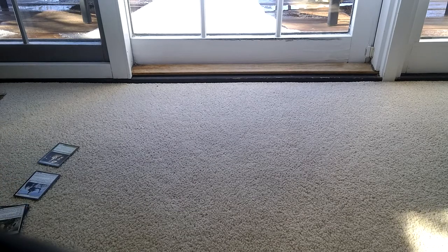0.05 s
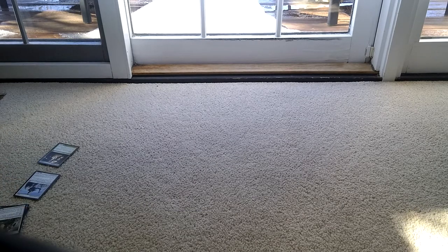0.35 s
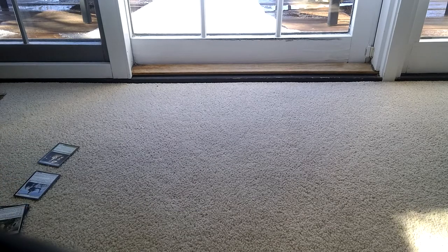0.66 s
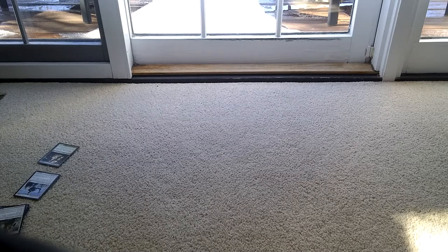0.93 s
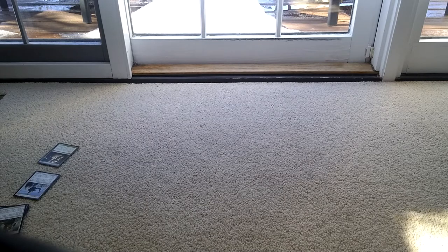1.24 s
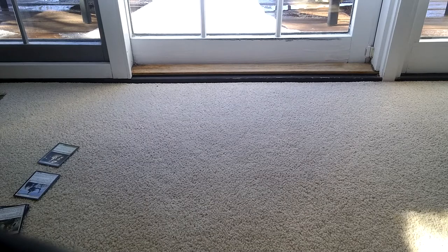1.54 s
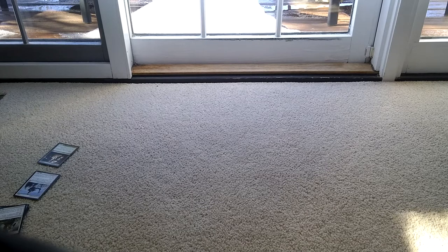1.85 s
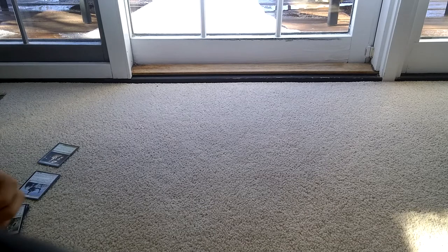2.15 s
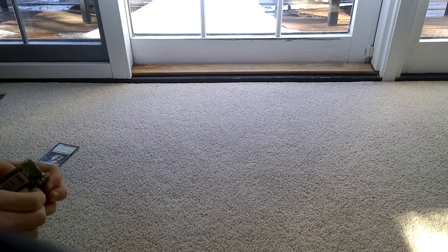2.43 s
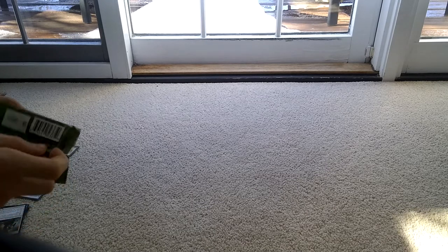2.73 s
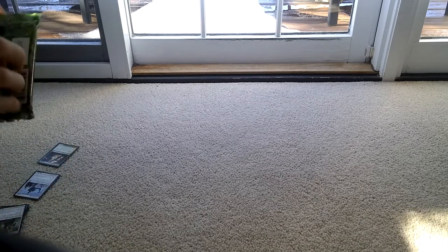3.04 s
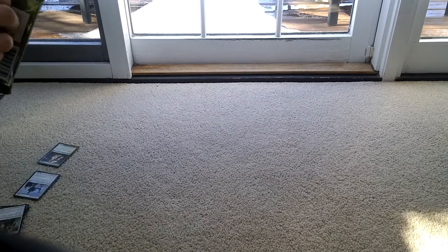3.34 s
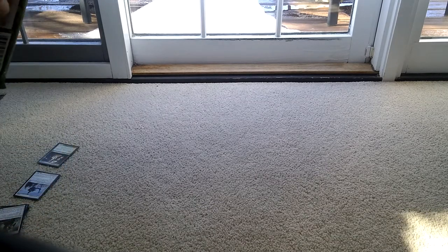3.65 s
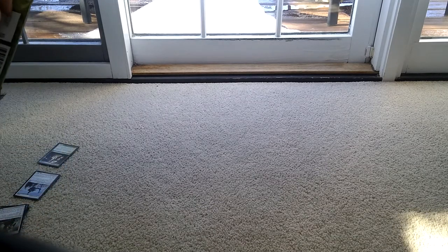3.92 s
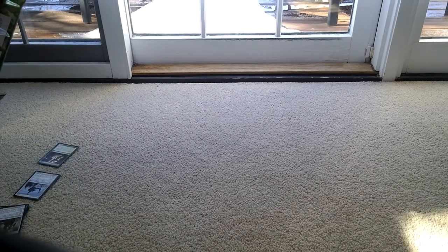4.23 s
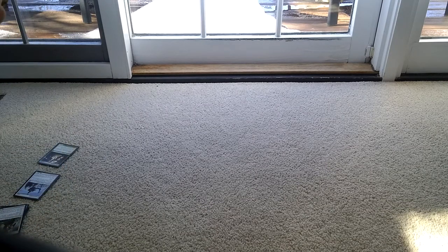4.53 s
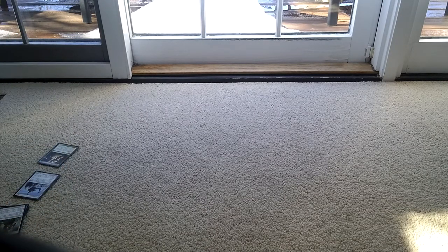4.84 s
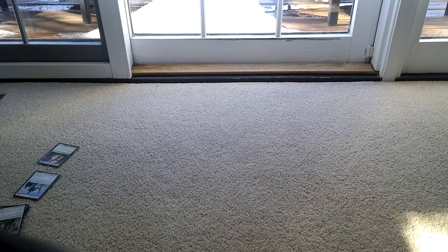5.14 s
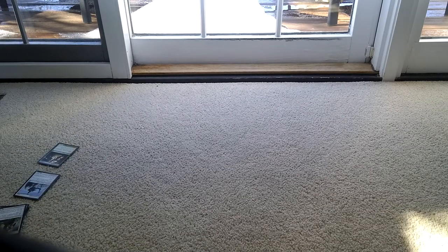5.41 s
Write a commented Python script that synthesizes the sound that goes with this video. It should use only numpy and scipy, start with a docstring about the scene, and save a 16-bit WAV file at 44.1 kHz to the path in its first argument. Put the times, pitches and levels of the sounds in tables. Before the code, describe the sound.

In a quiet carpeted room, a foil card wrapper crackles in uneven bursts, near the microphone and to the left, mixed with soft finger rubbing and taps. The handling pauses briefly, then a thin squeak leads into a short, loud rip. The foil keeps snapping and tears again at the end, with cards shifting inside, over a faint low hush.

```python
"""In a carpeted room, hands turn a foil card pack and tear it open, close by on the left.
Creases in the foil buckle with sharp snaps over finer crinkling, and whole panels flip with a pop.
The pinched seam squeaks, then rips. Fingers rub and knock the cards, which slide inside the pack.
A glass door and the room give a soft echo, and a low hush lies under it all."""
import sys
import numpy as np
from scipy import signal
from scipy.fft import rfft, irfft
from scipy.io import wavfile
from scipy.ndimage import uniform_filter1d, map_coordinates

SR = 44100
rng = np.random.default_rng(int(sys.argv[2]) if len(sys.argv) > 2 else 0)


def unload_wav(signal):
    """Save mono or channel-first audio to the path in sys.argv[1] as 16-bit WAV at rate SR, clipped to [-1, 1]."""
    wavfile.write(
        sys.argv[1],
        SR,
        np.round(np.clip(np.atleast_2d(signal).T, -1, 1) * 32767).astype(np.int16),
    )


N = 245794
TIME = np.arange(N) / SR
SIDES = np.array([[1], [-1]])  # left, right


def undb(db):
    """Turn decibels into a number to multiply by."""
    return 10 ** (np.asarray(db) / 20)


def unit(x):
    """Scale a sound to an average power of 1."""
    return x / np.sqrt(np.mean(x ** 2))


def butter(x, order, hz, kind):
    """Keep the lows, the highs or a band of a sound."""
    return signal.sosfilt(signal.butter(order, hz, kind, fs=SR, output="sos"), x)


def colour(x, points):
    """Shape the tone along a curve of (f/Hz, level/dB) points."""
    hz, db = np.transpose(points)
    f = np.fft.rfftfreq(x.shape[-1], 1 / SR) + 1
    return irfft(rfft(x) * undb(np.interp(np.log(f), np.log(hz), db)), x.shape[-1])


def place(x, pan_db):
    """Make the left side pan_db louder than the right."""
    return x * unit(undb(SIDES * pan_db / 2))


def add(out, x, t):
    """Mix a stereo sound in, with its middle at t seconds."""
    start = int(t * SR) - x.shape[1] // 2
    a, b = max(start, 0), min(start + x.shape[1], N)
    out[:, a:b] += x[:, a - start:b - start]


def gesture(start_s, length_s, db, swell_db=0, attack_s=0.013, release_s=0.037):
    """Loudness of one hand movement: it takes hold, changes by swell_db to reach db, and lets go."""
    t = TIME - start_s
    swell = undb(db + swell_db * (np.clip(t / length_s, 0, 1) - 1))
    return np.clip(t / attack_s, 0, 1) * swell * np.exp(-np.maximum(t - length_s, 0) / release_s)


def ringing(decay_s, size):
    """Stereo noise that dies away, with an energy of about 1 on each side."""
    tail = rng.standard_normal((2, size)) * np.exp(-np.arange(size) / SR / decay_s)
    return unit(tail) / np.sqrt(size)


def pulse(hz, octaves, travel_s, ring_db, ring_s, size):
    """A ripple in a sheet: its high notes arrive first, then it rattles between the edges."""
    f = np.fft.rfftfreq(size, 1 / SR) + 1
    band = np.exp(-(np.log2(f / hz) / (2 * octaves)) ** 2) / np.sqrt(f)
    phase_lag = 2 * np.pi * travel_s * (2 * np.sqrt(f * hz) - f)  # speed grows as the root of frequency
    rattle = rfft(ringing(ring_s, size // 2), size)
    apart = np.clip(f / 9000, 0, 1)  # low notes reach both sides alike
    rattle[1] = np.sqrt(1 - apart ** 2) * rattle[0] + apart * rattle[1]
    spectrum = band * np.exp(-1j * phase_lag) * (1 + undb(ring_db) * rattle)
    wave = np.roll(irfft(spectrum), size // 2, axis=1)
    return wave / np.sqrt(np.sum(wave ** 2, axis=1, keepdims=True))


def crackle(per_s, spread_db, tone, travel_s, ring_db=0):
    """Tiny buckles of uneven size at six pitches, each pitch clicking about per_s times a second."""
    out = 0
    for hz in np.geomspace(2500, 12000, 6):
        sizes = undb(spread_db * np.minimum(rng.exponential(size=N), 4)) * rng.choice([-1, 1], N)
        clicks = sizes * (rng.random(N) < per_s / SR)
        grain = pulse(hz, 0.72, travel_s, ring_db, ring_s=0.0022, size=1024) * np.sqrt(hz)
        out = out + signal.fftconvolve(clicks[None], grain, "same", axes=1)
    return unit(colour(out, tone))


# tone of the quiet room: f/Hz, level/dB
HUSH_TONE = [(20, -18.5), (60, 10.5), (120, -9), (200, -2), (330, -9), (1200, -13.5), (16000, -32.5)]
def air():
    """The low hush of the house, shared by both sides, and a separate hiss on each."""
    hush = butter(rng.standard_normal(N), 1, 500, "low")
    hiss = rng.standard_normal((2, N))
    bright_hiss = butter(hiss, 1, 500, "high")
    return unit(colour(hush + bright_hiss + .5 * hiss, HUSH_TONE)) * undb(-73.3)


# tone of the echo from the walls: f/Hz, level/dB
WALL_TONE = [(100, -3), (550, 0), (1000, 0), (1800, 1.5), (4000, 3.5), (8000, -2.5), (11000, -0.5),
             (16000, -0.5)]
def room(x, low_fade_s=0.26, high_fade_s=0.27, door_s=0.011):
    """The left side's sound bounces off the glass door, then dies away quickly around the room."""
    t = TIME[:SR // 2]
    low = butter(ringing(low_fade_s / np.log(1000), len(t)), 2, 5000, "low")  # 60 dB down per fade time
    high = butter(ringing(high_fade_s / np.log(1000), len(t)), 2, 5000, "high")
    tail = (low + high) * np.clip(t / door_s, 0, 1)
    door = np.roll(ringing(0.0037, len(t)), int(door_s * SR), axis=1)
    echo = undb(-11.2) * tail + undb(-17) * door
    return colour(signal.fftconvolve(x[:1], echo, axes=1)[:, :N], WALL_TONE) * undb(-3)


# skin strokes the pack: start t/s, length/s, level/dB
SKIN_STROKES = [(0, 0.51, -67.5), (0.272, .03, -51.5), (0.411, 0.25, -54.5), (0.919, 0.16, -67),
                (1.072, 0.11, -63.5), (1.221, 0.56, -58.5), (2.025, 0.12, -66), (2.245, 0.044, -57.5),
                (2.375, 0.12, -59.5), (2.573, 0.083, -58.5), (2.728, 0.08, -63), (2.987, 0.068, -51),
                (3.129, 0.48, -75), (4.042, 0.54, -68), (4.546, 0.14, -58.5), (4.904, 0.011, -51.5),
                (5.007, 0.099, -58.5), (5.183, 0.081, -55.5), (5.38, 0.27, -58)]
def rubbing():
    """How hard skin drags on the pack at each moment."""
    return sum(gesture(*stroke) for stroke in SKIN_STROKES)


def arms():
    """Moving arms make a faint rumble that swells with the rubbing."""
    middle, side = butter(rng.standard_normal((2, N)), 1, [45, 110], "band")
    rumble = unit(middle + .4 * SIDES * side)
    effort = uniform_filter1d(np.sqrt(rubbing()), SR // 4)
    return rumble * effort * undb(-43)


# tone of skin rubbing on the pack: f/Hz, level/dB
SKIN_TONE = [(70, -11.5), (190, -12), (330, -5), (580, -5), (850, -1), (1300, -6.5), (1750, -8.5),
             (2600, -16.5), (4000, -19), (9000, -51)]
# fingers knock the cards: t/s, level/dB, f/Hz, ring time/s
CARD_KNOCKS = [(0.299, -17, 550, 0.0013), (0.439, -17.5, 696, 0.016), (0.454, -23.5, 316, 0.022),
               (0.563, -16, 610, 0.0048), (0.582, -14.5, 696, 0.0017), (0.631, -22, 415, 0.0037),
               (0.933, -23.5, 636, 0.028), (1.109, -23, 644, .034), (1.359, -28, 520, 0.0035),
               (2.262, -26.5, 830, .012), (2.400, -17.5, 975, 0.0031), (2.562, -13.5, 1510, 0.0056),
               (2.648, -27.5, 384, 0.0093), (2.757, -28.5, 850, .012), (3.053, -25, 390, 0.0018),
               (3.191, -27, 161, 0.044), (3.235, -38.5, 740, .017), (4.369, -30, 810, 0.011),
               (4.552, -15.5, 430, .0038), (4.923, -26.5, 670, 0.00069), (5.222, -24, 545, 0.033),
               (5.413, -23.5, 590, 0.0033)]
def fingers(slips_per_s=700, thump_hz=222):
    """Skin drags over the pack in small slips; each knock on the cards also thumps the hand."""
    slips = rng.standard_normal(N) * (rng.random(N) < slips_per_s / SR)
    body = signal.fftconvolve(slips[None], ringing(0.004, size=1024), axes=1)[:, :N]
    out = unit(colour(slips + undb(10.5) * body, SKIN_TONE)) * rubbing()
    for t, db, hz, ring_s in CARD_KNOCKS:
        cards = pulse(hz, octaves=0.21, travel_s=0.00043, ring_db=-5, ring_s=ring_s, size=8192)
        flesh = pulse(thump_hz, octaves=1, travel_s=0.0011, ring_db=9, ring_s=ring_s, size=8192)
        knock = cards + undb(-4) * thump_hz / hz * flesh  # deeper knocks thump more
        add(out, undb(db) * knock[[0, 0]], t)  # same wave on both sides
    return place(out, pan_db=-1)


# cards slide inside the wrapper: start t/s, length/s, final level/dB, swell/dB
CARD_SLIDES = [(0.199, 0.435, -59.5, 3), (5.374, 0.23, -40, 19)]
def sliding_cards(slips_per_s=900):
    """Card edges catch and slip on the foil, and two hollows in the pack ring."""
    slips = rng.standard_normal(N) * (rng.random(N) < slips_per_s / SR)
    hollows = sum(pulse(hz, octaves=.12, travel_s=.001, ring_db=-8, ring_s=.002, size=1024)
                  for hz in (1250, 1700))
    rustle = unit(signal.fftconvolve(slips[None], hollows, "same", axes=1))
    return place(rustle, pan_db=3.5) * sum(gesture(*push) for push in CARD_SLIDES)


# foil drags over foil: middle t/s, length/s, level/dB, f/Hz
FOIL_SCRAPES = [(0.289, 0.013, -43, 8200), (0.643, 0.018, -54, 4020), (1.214, 0.022, -36, 7400),
                (1.253, .022, -39.5, 6940), (1.285, 0.012, -35.5, 7540), (1.672, 0.019, -42, 7760),
                (2.585, 0.031, -47.5, 4330), (2.665, 0.028, -58, 6300), (3.029, 0.019, -58, 6500)]
def scrapes():
    """Slips too fast to hear apart each send a ripple through the foil, making a short buzz."""
    out = np.zeros((2, N))
    for t, length_s, db, hz in FOIL_SCRAPES:
        size = int(length_s * SR)
        gaps_s = .0009 * rng.uniform(.5, 1.5, size=200)
        slips = np.bincount((np.cumsum(gaps_s) * SR).astype(int), minlength=size)[:size]
        faded = slips * signal.windows.tukey(size, .6)
        ripple = pulse(hz, octaves=.42, travel_s=.0006, ring_db=-4, ring_s=.001, size=512)
        buzz = unit(signal.fftconvolve(faded[None], ripple, axes=1))
        add(out, undb(db) * place(buzz, pan_db=33), t)
    return out


# tone of crackling foil: f/Hz, level/dB
FOIL_TONE = [(400, -12), (1000, -6), (2500, -6.5), (4500, -10), (10000, 1), (13000, -2), (16000, -1)]
# fingers squeeze the foil: start t/s, length/s, level/dB
FOIL_SQUEEZES = [(0, 0.3, -52.5), (0.256, 0.049, -57), (0.322, .11, -63.5), (0.429, 0.036, -49),
                 (0.51, 0.092, -59), (0.615, 0.012, -37), (.7, 0.015, -64), (0.866, .2, -68),
                 (1.076, 0.031, -50), (1.21, 0.33, -48), (1.455, .28, -46), (1.787, 0.26, -60),
                 (2.009, 0.14, -49.5), (2.215, 0.05, -39), (2.34, .18, -49), (2.549, 0.12, -49.5),
                 (2.733, 0.063, -50.5), (2.97, 0.059, -37.5), (3.06, 0.18, -56), (3.247, 0.65, -69),
                 (4.058, 0.072, -51.5), (4.702, 0.19, -58), (5, 0.1, -52.5), (5.176, 0.076, -44),
                 (5.389, 0.11, -46), (5.507, 0.055, -41)]
def crinkle():
    """Each squeeze brings fine crackling and a soft swish of foil on skin."""
    flex = sum(gesture(*squeeze, attack_s=.01, release_s=.02) for squeeze in FOIL_SQUEEZES)
    grains = crackle(per_s=45, spread_db=5, tone=FOIL_TONE, travel_s=.0007, ring_db=-2)
    swish = crackle(per_s=1200, spread_db=2, tone=FOIL_TONE, travel_s=.0007)
    return place(undb(-2.5) * grains + undb(-8) * swish, pan_db=11.5) * flex


def squeak(start_s=4.329, length_s=.068, start_hz=5090, rise_hz_per_s=9000):
    """The pinched seam sticks and slips: a shaky, raspy squeal, higher and louder as it stretches."""
    pinch = gesture(start_s, length_s, db=0, swell_db=14, attack_s=.01, release_s=.008)
    hz = start_hz + rise_hz_per_s * np.clip(TIME - start_s, 0, length_s)
    wobble = unit(uniform_filter1d(rng.standard_normal(N), size=24))
    phase = 2 * np.pi * np.cumsum(hz * (1 + .06 * wobble)) / SR
    squeal = unit(np.sin(phase) + .35 * np.sin(2 * phase))
    rasp = crackle(per_s=800, spread_db=2.5, tone=FOIL_TONE, travel_s=.0006)
    return place(undb(-45) * squeal + undb(-43) * rasp, pan_db=7.5) * pinch


# tone of the tearing seam: f/Hz, level/dB
SEAM_TONE = [(400, -22), (650, -17), (1000, -53), (1800, -7), (2500, -23), (3200, -5), (4400, -6.5),
             (6500, -15), (10500, -5), (16000, -10)]
# the seam gives way: start t/s, length/s, final level/dB, swell/dB (below zero it fades)
SEAM_TEARS = [(1.438, 0.21, -56, -9), (4.442, 0.121, -25.5, 30.5), (5.41, 0.35, -45, 13)]
def rip():
    """The seam parts in runs of tiny breaks."""
    breaks = crackle(per_s=260, spread_db=3.5, tone=SEAM_TONE, travel_s=.0008)
    pull = sum(gesture(*tear, release_s=0.016) for tear in SEAM_TEARS)
    return place(breaks, pan_db=24.5) * pull


# whole panels of the wrapper flip over: t/s, level/dB, f/Hz
PANEL_POPS = [(0.704, -14, 1070), (1.256, -23, 4600), (1.479, -14.5, 1320), (1.547, -10, 4270),
              (1.607, -11, 1390), (1.713, -12.5, 2620), (2.024, -11.5, 3520), (2.413, -14, 1920),
              (4.552, 1.5, 1950), (4.563, 2.5, 4370), (5.103, -14.5, 3100), (5.154, -8.5, 3080),
              (5.25, -10.5, 3360), (5.415, -11.5, 1620), (5.477, -2, 2450), (5.522, -0.5, 1920)]
def pops():
    """A panel flips with a short, hollow ring; higher notes sit further to the left."""
    out = np.zeros((2, N))
    for t, db, hz in PANEL_POPS:
        ring = pulse(hz, octaves=.24, travel_s=.001, ring_db=-8, ring_s=.002, size=2048)
        add(out, undb(db) * place(ring, pan_db=6 * np.log2(hz / 1000)), t)
    return out


# creases buckle loudly: t/s, level/dB, f/Hz, left minus right/dB
CREASE_SNAPS = [(0.0299, -19.5, 8600, 16), (0.1483, -20, 7340, 20), (0.268, -18, 7500, 16),
                (0.2795, -10.5, 8260, 16), (0.3, -19, 3660, 27), (0.4455, -7.5, 8900, 20),
                (0.6304, -9, 4480, 14), (0.7002, -9.5, 8800, 12), (0.7604, -8.5, 7850, 0.5),
                (1.0704, -10, 6230, 12), (1.0963, -9, 9500, 18), (1.124, -21.5, 8400, 26),
                (1.225, -9, 8400, 7), (1.248, -31, 6700, 50), (1.268, -14, 11000, 4),
                (1.316, -12, 7650, 10), (1.3308, 4, 8400, 22), (1.3484, -15, 9400, -10),
                (1.396, -3.5, 9200, 14), (1.4529, -16, 9100, -1), (1.4622, -18.5, 2980, 12),
                (1.4781, -5.5, 7900, 15), (1.52, -15.5, 8350, 4), (1.5439, -3.5, 6800, 16),
                (1.5665, -13, 6650, 26), (1.607, -8, 6330, 10), (1.6611, -9.5, 9500, 17),
                (1.6788, -9, 7060, 12), (1.7124, -7, 4850, 10), (1.7268, -19, 3700, 0),
                (1.9057, -23.5, 4900, 16), (2.0245, -5.5, 6210, 10), (2.043, 3.5, 7340, 19),
                (2.069, -8.5, 7250, 8), (2.1428, -22, 6700, 9), (2.2237, -9.5, 8850, 18),
                (2.2333, -4.5, 7750, 28), (2.279, -16, 3800, 13), (2.3368, -20, 5530, 30),
                (2.3847, -22, 6300, 21), (2.3988, -1, 8800, 20), (2.4134, -9, 3700, -19),
                (2.5022, -22.5, 8000, 10), (2.559, -9.5, 7000, 46), (2.57, -7, 4450, 8),
                (2.6316, -12.5, 5430, 16), (2.6413, -9, 6700, -43), (2.6448, -8.5, 6340, 5),
                (2.662, -15.5, 7000, -18), (2.7434, -22.5, 6950, 18), (2.757, -20, 6860, 21),
                (2.8263, -23.5, 8400, 25), (2.847, -22.5, 9450, 22), (2.9219, -18.5, 7000, 39),
                (2.955, -17, 5940, 11), (2.97, -6, 9000, 17), (2.9933, -17, 8250, -5),
                (3.0059, -13, 6300, 21), (3.0204, -8.5, 5250, 8), (3.029, -5, 7800, 25),
                (3.0507, -17.5, 5900, 5), (3.4843, -30.5, 5050, 15), (3.4985, -25.5, 9500, 21),
                (3.6005, -31.5, 8360, 6), (3.9546, -27.5, 7450, 22), (4.011, -23, 8000, 23),
                (4.127, -39, 7300, 15), (4.156, -10, 8700, 11), (4.242, -25.5, 9030, 11),
                (4.3683, -27, 5530, 27), (4.3819, -11.5, 6500, 13), (4.4521, -20.5, 5500, 17),
                (4.471, -8, 9200, 9), (4.497, -8.5, 9000, 20), (4.518, -4.5, 7860, 7),
                (4.5262, -8.5, 6600, 11), (4.5337, -9, 6230, 10), (4.5407, -10, 6800, -16),
                (4.5542, -1, 3370, 41), (4.5611, 5, 5530, 8), (4.5744, -15, 6200, -18),
                (4.733, -16, 8500, 6), (4.762, -22, 3440, 9), (4.7986, -27, 2870, 20),
                (4.8375, -27.5, 3520, 13), (4.9088, -10, 6900, 17), (4.923, -13.5, 6200, 42),
                (4.9405, -8.5, 6900, -4), (5.0009, -15, 4600, 9), (5.0255, -2.5, 6120, 6.5),
                (5.0443, -11.5, 5960, -3), (5.0604, -14.5, 4540, 31), (5.1021, -14, 4300, 12),
                (5.158, -15.5, 8260, 10), (5.181, -1.5, 10000, 16), (5.195, -15, 10600, -20),
                (5.201, -13, 6660, 25), (5.248, -19, 4600, 4), (5.3427, -20.5, 8550, 14),
                (5.396, -24, 3130, 8), (5.4137, -8.5, 5430, 19), (5.443, -11, 4300, 28),
                (5.4465, -9.5, 4700, 10), (5.4769, -16, 3000, 20), (5.522, -1, 7200, 37),
                (5.532, -1.5, 7060, 1), (5.5477, -5.5, 5870, 22)]
def snaps():
    """A crease snaps along with four neighbours; the wrapper shivers and the cards thud faintly."""
    out = np.zeros((2, N))
    for t, db, hz, pan_db in CREASE_SNAPS:
        octaves = 0.58 * (5760 / hz)  # a stiffer, higher crease has a narrower band
        travel_s = .0007 * rng.uniform(.4, 1.6)
        crack = pulse(hz, octaves, travel_s, ring_db=-1, ring_s=.0008, size=1024)
        shiver = pulse(0.729 * hz, 0.99, travel_s, ring_db=11, ring_s=0.0079, size=2048)
        thud = pulse(605, 1, travel_s, ring_db=3.5, ring_s=0.018, size=2048)
        add(out, undb(db) * place(crack, pan_db), t)
        add(out, undb(db - 10) * place(shiver, pan_db / 2), t)
        add(out, undb(db - 32) * place(thud, pan_db=0.5), t)
        neighbours = rng.uniform([-0.00091, -19, -1.3], [0.0065, -10, .5], (4, 3))
        for delay_s, size_db, shift_octaves in neighbours:
            small = pulse(hz * 2 ** shift_octaves, .4, travel_s, ring_db=-1, ring_s=.001, size=512)
            add(out, undb(db + size_db) * place(small, pan_db / 2), t + delay_s)
    return out


# foil tone by side; the left takes half of each cut, the right gets it as a boost: f/Hz, level/dB
SIDE_TONE = [(200, -2), (2000, -2), (4000, -.3), (7000, -1), (10500, -.3), (13000, -2.5), (16000, -3)]
# how much later the right side hears the pack as it is lifted: t/s, delay/s
RIGHT_DELAY = [(0, 0.00037), (2.3, 0.00034), (2.6, 0.0002), (5.57, 0.00025)]
def scene():
    """Foil, fingers and cards close by, with the room's echo, moving arms and the hush behind them."""
    foil_left, foil_right = snaps() + pops() + scrapes() + crinkle() + rip() + squeak()
    foil_left = colour(foil_left, [(hz, db / 2) for hz, db in SIDE_TONE])
    foil_right = colour(foil_right, [(hz, -db) for hz, db in SIDE_TONE])
    left, right = np.array([foil_left, foil_right]) + fingers() + sliding_cards()
    delay_s = np.interp(TIME, *np.transpose(RIGHT_DELAY))
    late_right = map_coordinates(right, [(TIME - delay_s) * SR], order=5)
    pack = np.array([left, late_right])
    return pack + room(pack) + arms() + air()


def record(dry):
    """Round off the loudest peaks and cut the very highest notes."""
    top_cut = signal.ellip(10, .2, 80, 16000, fs=SR, output="sos")
    return signal.sosfilt(top_cut, np.tanh(dry))


dry = scene()
out = record(dry)
unload_wav(out)
```